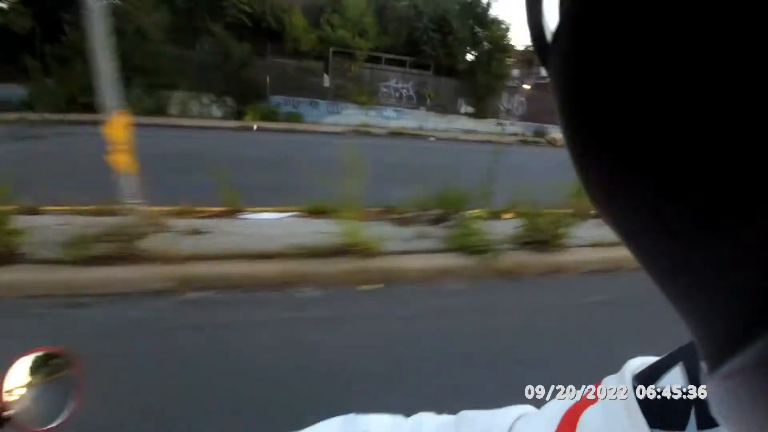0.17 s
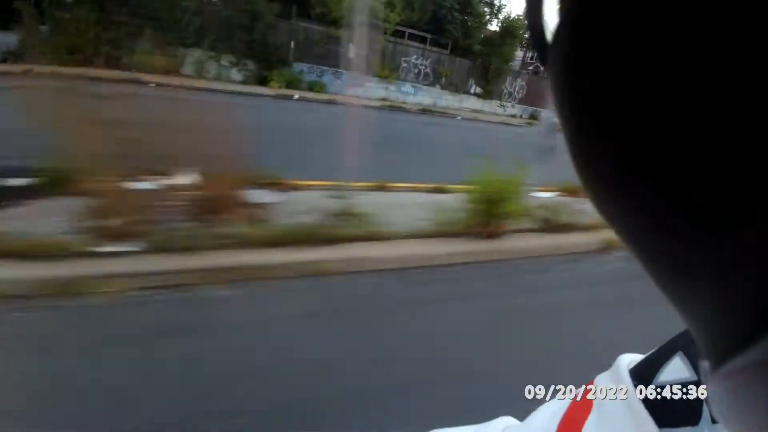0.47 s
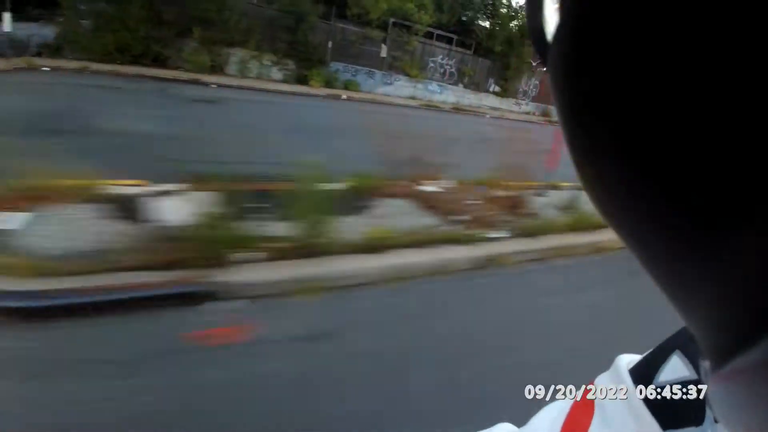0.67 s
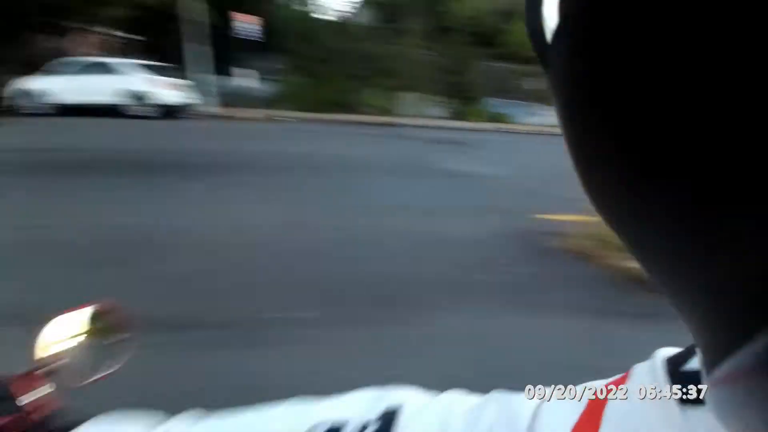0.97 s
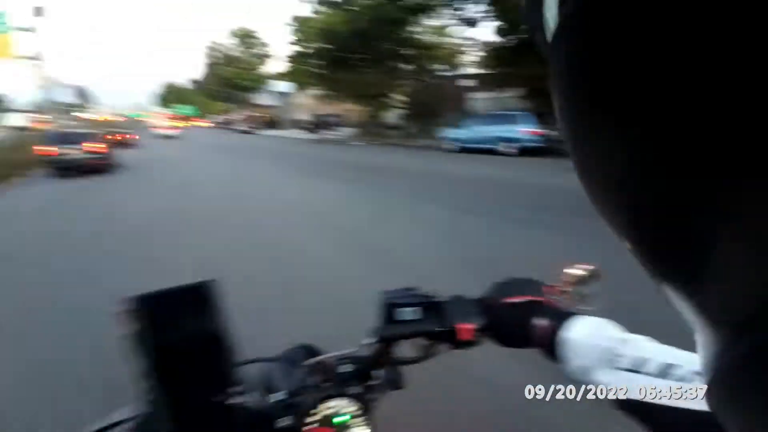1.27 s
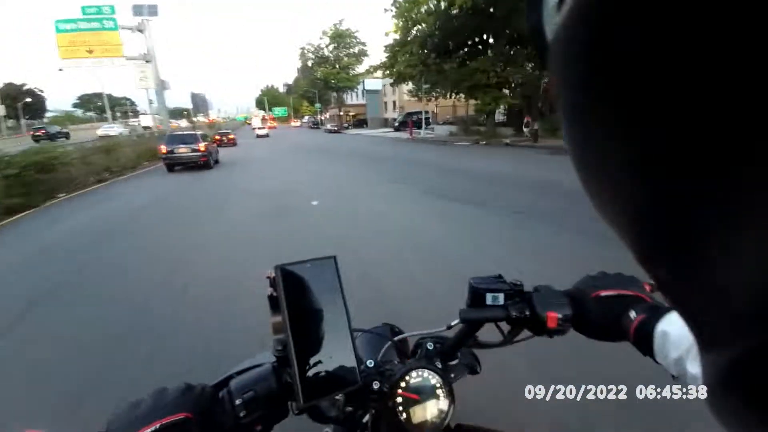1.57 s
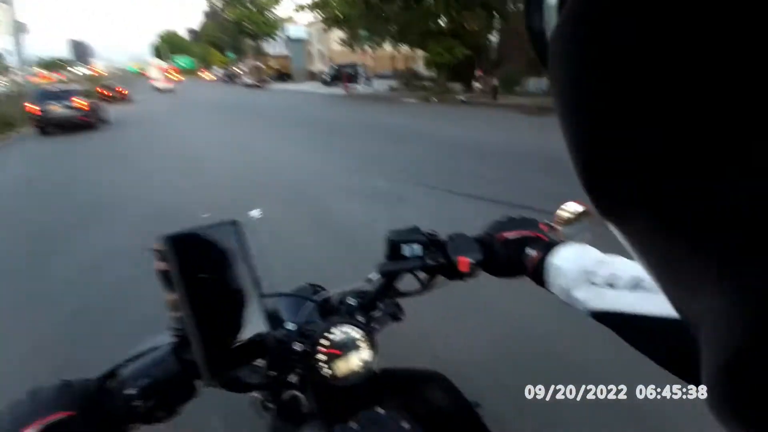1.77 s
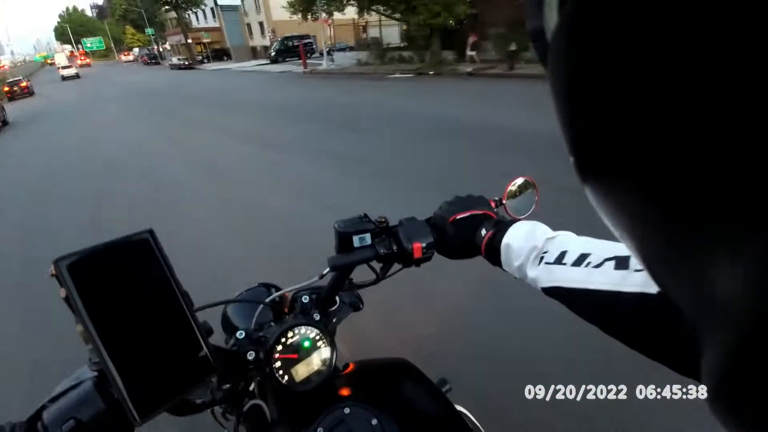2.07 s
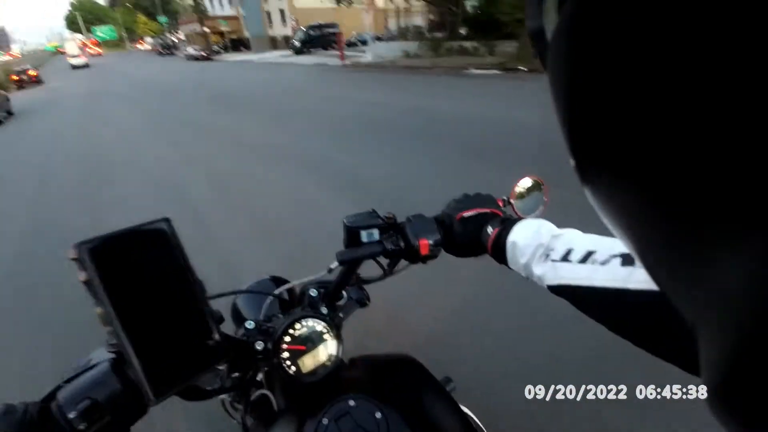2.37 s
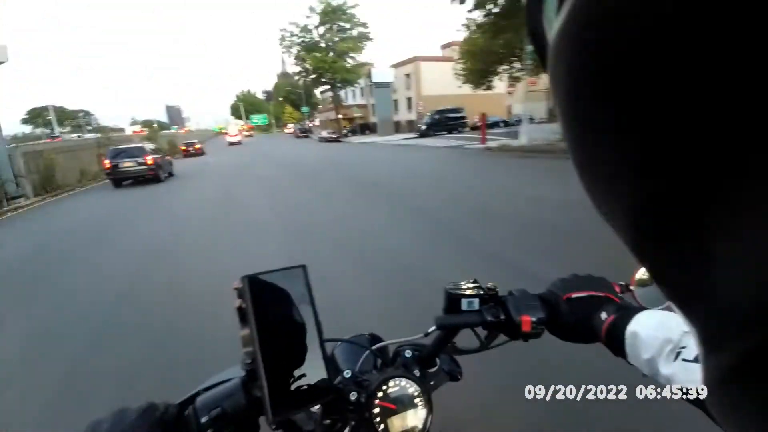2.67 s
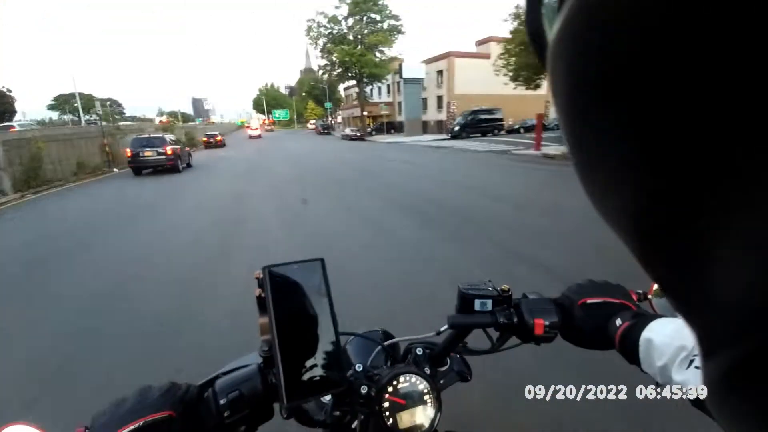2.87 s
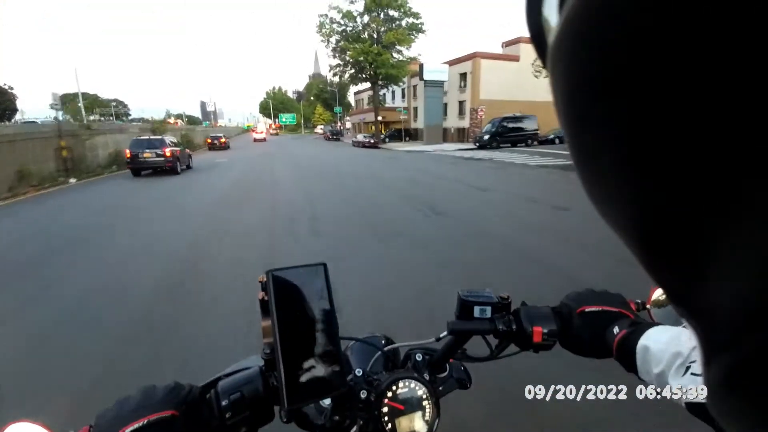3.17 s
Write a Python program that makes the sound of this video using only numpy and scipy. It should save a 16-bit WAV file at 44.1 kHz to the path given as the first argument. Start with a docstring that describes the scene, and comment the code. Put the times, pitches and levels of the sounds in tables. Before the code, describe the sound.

A twin-cylinder motorcycle holds a steady low throb on a wide open road, heard close at the rider; wind rumbles and buffets the microphone, tyres roar, and a crackling gust comes after two seconds.

```python
"""Twin-cylinder motorcycle cruising on a wide city road

Heard at a microphone on the rider: exhaust pulses in uneven pairs excite the resonances of pipe and body.
Coloured noise gives wind rumble, tyre roar and air hiss; swells of noise give buffets, and short bursts
give ticks and eddies. Dense random pops crackle, most strongly in one gust; faint whines are drifting sines.
The sound fades in quickly just after the start.
"""
import sys
import numpy as np
from scipy import signal
from scipy.fft import rfft, irfft, next_fast_len
from scipy.io import wavfile
from scipy.ndimage import uniform_filter1d, minimum_filter1d, map_coordinates

SR = 44100
rng = np.random.default_rng(int(sys.argv[2]) if len(sys.argv) > 2 else 0)


def master(y):
    """Save y as 16-bit WAV."""
    cut = np.clip(np.atleast_2d(y).T, -1, 1)
    pcm = np.round(cut * 32767)  # scale
    wavfile.write(sys.argv[1], SR, pcm.astype(np.int16))


N = 145971


def amp(db):
    """Logarithmic level: decibels to amplitude ratio."""
    return 10 ** (np.asarray(db) / 20)


def unit(x):
    """Normalisation: scale to an rms of 1."""
    return x / np.sqrt(np.mean(x ** 2) + 1e-20)


def along(points, hz):
    """Spectral envelope: interpolate (f/Hz, value) points on a logarithmic frequency axis."""
    f, value = np.transpose(points)
    return np.interp(np.log(hz + 1), np.log(f + 1), value)


def curve(rows):
    """Temporal envelope: (t/s, value) points as one value per sample."""
    return np.interp(np.arange(N) / SR, *np.transpose(rows))


def wobble(rate):
    """Random modulation: a smooth curve through normal random knots, rate knots per second."""
    knots = rng.standard_normal(int(N * rate / SR) + 4)
    return map_coordinates(knots, [np.arange(N) * rate / SR])


def filtered(x, response):
    """Linear filtering: multiply the spectrum by a response of frequency."""
    size = next_fast_len(N + SR // 2)  # zero padding leaves room for the filter's tail
    spectrum = rfft(x, size) * response(np.fft.rfftfreq(size, 1 / SR))
    return irfft(spectrum, size)[..., :N]


def noise(colour):
    """Coloured noise: white noise shaped by a spectral envelope, at rms 1."""
    white = rng.standard_normal(N)
    return unit(filtered(white, lambda hz: amp(along(colour, hz))))


def ring(pulses, colour, size=8192):
    """Minimum-phase resonance: pulses excite a causal body of the given colour, at rms 1."""
    hz = np.fft.rfftfreq(size, 1 / SR)
    cepstrum = irfft(np.log(amp(along(colour, hz))))
    # folding the cepstrum onto positive time makes the response causal
    cepstrum[1:size // 2] *= 2
    cepstrum[size // 2 + 1:] = 0
    impulse_response = irfft(np.exp(rfft(cepstrum)))
    return unit(signal.fftconvolve(pulses, impulse_response)[:N])


# air hissing past the helmet: t/s, level/dB
HISS_LEVEL = [(.15, -61), (.55, -65.5), (.62, -61), (.7, -55), (.82, -61), (.94, -61.5), (.98, -68),
              (1.04, -56), (1.14, -69.5), (1.7, -72), (2.05, -62), (2.39, -72), (2.46, -58.5), (2.54, -74),
              (2.82, -65.5), (3.03, -73), (3.17, -65.5), (3.3, -75)]
# spectrum of the hiss: f/Hz, relative level/dB
HISS_SPECTRUM = [(1500, 1.5), (3500, 10), (7500, 8.5), (10000, 9), (13000, 8.5), (15000, -25)]
# highest sizzle of the air: t/s, level/dB
SIZZLE_LEVEL = [(.15, -52.5), (.34, -52), (.43, -71), (.56, -70), (.66, -54), (.78, -56), (.95, -56.5),
                (.99, -73), (1.7, -97), (1.82, -60), (1.97, -54.5), (2.14, -54.5), (2.28, -63), (2.4, -81),
                (2.72, -70), (2.79, -63), (3.0, -68), (3.3, -79)]
# spectrum of the sizzle: f/Hz, relative level/dB
SIZZLE_SPECTRUM = [(4000, -37), (9400, -29), (10200, 3.5), (10800, -2.5), (12300, 8.5), (14000, -2),
                   (15200, 6)]


def air():
    """Aerodynamic broadband noise: hiss and a higher sizzle swell as the airflow changes its angle."""
    hiss = amp(curve(HISS_LEVEL) + 0.75 * wobble(60)) * noise(HISS_SPECTRUM)
    sizzle = amp(curve(SIZZLE_LEVEL)) * noise(SIZZLE_SPECTRUM)
    return hiss + sizzle


LOW_WHINE_HZ, MID_WHINE_HZ, HIGH_WHINE_HZ = 1035, 3397, 12174
WHINE_DRIFT_HZ = 5.3  # scale of the random pitch drift
# faint low whine: t/s, level/dB
LOW_WHINE_LEVEL = [(.2, -55.5), (.8, -63.5), (1.35, -68), (1.6, -51.5), (2.4, -86), (3.3, -64)]
# faint middle whine: t/s, level/dB
MID_WHINE_LEVEL = [(.15, -72.5), (.6, -71.5), (.8, -77), (2.6, -92)]
# faint high whine: t/s, level/dB
HIGH_WHINE_LEVEL = [(.15, -71), (.44, -70), (.56, -82), (1.5, -81), (1.66, -92), (1.76, -73), (2.55, -75),
                    (2.9, -75), (3.3, -75)]


def whines():
    """Frequency modulation: thin sine tones drift slightly in pitch, and swell and fade."""
    tones = [(LOW_WHINE_HZ, LOW_WHINE_LEVEL), (MID_WHINE_HZ, MID_WHINE_LEVEL),
             (HIGH_WHINE_HZ, HIGH_WHINE_LEVEL)]
    total = np.zeros(N)
    for hz, level in tones:
        phase = 2 * np.pi * np.cumsum(hz + WHINE_DRIFT_HZ * wobble(23.75)) / SR
        total += amp(curve(level)) * np.sqrt(2) * np.sin(phase)  # root 2 gives the sine an rms of 1
    return total


# faint ticks and scuffs of the riding gear: t/s, initial level/dB, time to decay by 60 dB/s
TICK_EVENTS = [(0.606, -50.5, .04), (.645, -55, 0.13), (0.679, -54, 0.1), (0.759, -48, .04),
               (1.191, -52, .035), (3.128, -52, 0.037)]
# spectrum of the ticks: f/Hz, relative level/dB
TICK_SPECTRUM = [(600, -29), (1800, 5), (3800, 4), (6000, -7), (10000, -6), (15000, -15)]


def ticks():
    """Exponential decay: abrupt noise bursts make dry little snaps and slightly longer scuffs."""
    t = np.arange(N) / SR
    envelope = np.zeros(N)
    for start, db, t60 in TICK_EVENTS:
        envelope += (t >= start) * amp(db - 60 * np.abs(t - start) / t60)
    return envelope * noise(TICK_SPECTRUM)


ROAD_DB = -47
# spectrum of tyres on asphalt: f/Hz, relative level/dB
ROAD_SPECTRUM = [(150, -28), (400, -2), (600, -7), (800, 7), (1100, 4), (1400, -1.5), (1900, -7.5),
                 (2400, -10), (3000, -17.5), (4200, -24.5), (5500, -22.5), (8000, -41), (12500, -44),
                 (15000, -61)]


def road():
    """Rolling noise: a steady broadband tyre roar with a slight grain from random level modulation."""
    level_db = ROAD_DB + 1.3 * wobble(6.95) + 0.84 * wobble(180)
    return amp(level_db) * noise(ROAD_SPECTRUM)


REFLECT_DB, REFLECT_T60_S = -8, 0.025  # reflected level relative to direct; time to decay by 60 dB


def reflected(x):
    """Early reflection: a short decaying noise tail stands for tank, screen and road, at equal total level."""
    t = np.arange(SR // 20) / SR
    tail = rng.standard_normal(len(t)) * amp(-60 * t / REFLECT_T60_S)
    wet = signal.fftconvolve(x, tail / np.linalg.norm(tail))[:N]
    return (x + amp(REFLECT_DB) * wet) / np.sqrt(1 + amp(REFLECT_DB) ** 2)


# wind on the microphone: t/s, level/dB
WIND_LEVEL = [(.15, -29), (.43, -30), (.7, -32), (1.03, -34), (1.16, -33), (1.35, -32), (1.7, -33.5),
              (1.87, -29.5), (2.07, -32.5), (2.43, -28.5), (2.55, -35.5), (2.85, -33), (3.07, -31),
              (3.3, -32.5)]
# spectrum of the wind rumble: f/Hz, relative level/dB
RUMBLE_SPECTRUM = [(25, -28), (44, -35), (58, -9), (85, 1), (140, 5.5), (220, -3), (340, -6.5), (480, -14),
                   (700, -23.5), (1500, -38), (4000, -58), (9000, -56)]


def wind():
    """Turbulent pressure fluctuation: low noise flutters quickly around the strength of the wind."""
    flutter_db = 1.3 * wobble(45)
    rumble = unit(noise(RUMBLE_SPECTRUM) * amp(flutter_db))
    return amp(curve(WIND_LEVEL)) * rumble


# single buffets of wind: peak t/s, half-length/s (Gaussian standard deviation), peak level/dB, centre f/Hz
BUFFET_EVENTS = [(.166, 0.024, -32.5, 463), (0.212, 0.042, -33, 230), (1.169, 0.042, -28, 206),
                 (1.28, 0.14, -43, 210), (2.08, 0.045, -36, 536), (2.45, .018, -51, 332)]
# spectrum of one buffet: f/centre f (a ratio), relative level/dB
BUFFET_SPECTRUM = [(.3, -33), (.75, 2.5), (1.3, -4), (2, -14), (4, -33), (16, -61)]


def buffets():
    """Gaussian envelope: short swells of turbulent noise, each around its own centre frequency."""
    t = np.arange(N) / SR
    total = np.zeros(N)
    for peak, length, db, centre_hz in BUFFET_EVENTS:
        spectrum = [(ratio * centre_hz, level) for ratio, level in BUFFET_SPECTRUM]
        swell = np.exp(-.5 * ((t - peak) / length) ** 2)
        total += amp(db) * swell * noise(spectrum)
    return total


POPS_PER_S, POP_SCATTER_DB = 1200, 6  # mean rate; spread of sizes before the largest are capped
# turbulent crackle in the gusts: t/s, level/dB
CRACKLE_LEVEL = [(.16, -47), (.25, -49.5), (.7, -53), (1.0, -49.5), (1.35, -48.5), (1.7, -50), (1.94, -40),
                 (2.0, -42), (2.07, -35.5), (2.135, -39.5), (2.21, -38.5), (2.28, -40), (2.33, -38.5),
                 (2.43, -39.5), (2.465, -45.5), (2.505, -36.5), (2.53, -53), (3.3, -58.5)]
# spectrum of one pop, also used by the eddies: f/Hz, relative level/dB
POP_SPECTRUM = [(60, -30), (200, -5.5), (400, 2.5), (900, -4), (1500, -11), (2500, -17.5), (4000, -26),
                (7000, -39), (14000, -47)]


def crackle():
    """Random impulse process: eddies burst on the microphone as dense pops of uneven size."""
    pops = (rng.random(N) < POPS_PER_S / SR) * np.sign(rng.standard_normal(N))
    sizes = amp(POP_SCATTER_DB * np.minimum(rng.standard_normal(N), 2))
    return amp(curve(CRACKLE_LEVEL)) * ring(pops * sizes, POP_SPECTRUM)


EDDY_T60_S, EDDY_TOP_HZ = .012, 4000  # time to decay by 60 dB; low-pass corner
# the hardest eddies: t/s, initial level/dB before the low-pass
EDDY_EVENTS = [(2.311, -26), (2.424, -30), (2.43, -29.5), (2.504, -38.5), (2.558, -30.5)]


def eddies():
    """Low-passed transient: decaying noise bursts stand out of the crackle, strong but blunt."""
    t = np.arange(N) / SR
    envelope = np.zeros(N)
    for start, db in EDDY_EVENTS:
        envelope += (t >= start) * amp(db - 60 * np.abs(t - start) / EDDY_T60_S)
    bursts = envelope * noise(POP_SPECTRUM)
    return filtered(bursts, lambda hz: 1 / np.sqrt(1 + (hz / EDDY_TOP_HZ) ** 4))


FIRST_FIRING_S, SECOND_CYLINDER_TURN = .131, 450 / 720  # turn is a share of the four-stroke cycle
ENGINE_DB, SECOND_CYLINDER_DB = -32, -4  # the second is relative to the first cylinder
FIRING_SCATTER_DB, FIRING_JITTER_S = 1.3, .0001  # standard deviations
# engine speed: t/s, four-stroke cycle rate f/Hz
ENGINE_SPEED = [(0, 19.5), (.6, 19.58), (1.2, 19.78), (1.5, 19.93), (1.8, 20.03), (2.1, 20.25),
                (2.5, 20.17), (3.3, 20.5)]
# resonances of exhaust pipe and body: f/Hz, relative level/dB
PIPE_SPECTRUM = [(40, -56), (65, -20.5), (98, 2), (122, 0.5), (160, 1.5), (200, -6), (245, -17.5),
                 (300, -6), (380, -19), (600, -34.5), (2000, -50), (8000, -94)]


def engine():
    """Source and resonator: two cylinders fire at uneven spacing, one louder, into the exhaust."""
    t = np.arange(N) / SR
    cycle = np.cumsum(curve(ENGINE_SPEED)) / SR
    cycle -= np.interp(FIRST_FIRING_S, t, cycle)  # cycle zero is the first firing
    pulses = np.zeros(N)
    for turn, db in [(0, 0), (SECOND_CYLINDER_TURN, SECOND_CYLINDER_DB)]:
        times = np.interp(np.arange(turn, cycle[-1], 1), cycle, t)
        late, strong = rng.standard_normal((len(times), 2)).T
        at = np.clip((times + FIRING_JITTER_S * late) * SR, 0, N - 1).astype(int)
        pulses[at] += amp(db + FIRING_SCATTER_DB * strong)
    return amp(ENGINE_DB) * ring(pulses, PIPE_SPECTRUM)


# bass mismatch of the two microphone ports: strength and corner of a first-order low-pass
PORT_MISMATCH_HZ, PORT_CORNER_HZ = 51.3, 7.6
# share of tyre roar that differs between the ports: f/Hz, level/dB
SPREAD_SPECTRUM = [(100, -1), (500, -9), (1000, -38.5), (2000, -28), (3000, -11.5), (5000, -17.5),
                   (8000, -22), (12000, -25)]


def scene():
    """Mid-side superposition: two close ports share most sound but differ in bass and in some tyre roar."""
    engine_and_wind = engine() + wind() + buffets() + crackle() + eddies()
    mid = engine_and_wind + reflected(road() + air() + ticks()) + whines()
    bass_side = filtered(mid, lambda hz: -PORT_MISMATCH_HZ / (PORT_CORNER_HZ + 1j * hz))
    roar_side = filtered(road(), lambda hz: amp(along(SPREAD_SPECTRUM, hz)))
    side = bass_side + roar_side
    return np.array([mid + side, mid - side])


START_S, FADE_S = .12, .034
LIMIT_DB, LIMIT_HOLD_S = -16.8, .012  # threshold for the mean of both ports; window of the gain
TOP_HZ = 15300


def record(dry):
    """Peak limiting and band limiting: a quick fade-in, peaks held down, nothing kept above the top."""
    fade = np.clip((np.arange(N) / SR - START_S) / FADE_S, 0, 1) ** 2
    hold = int(LIMIT_HOLD_S * SR)
    needed = amp(LIMIT_DB) / np.maximum(np.abs(dry.mean(axis=0)), amp(LIMIT_DB))
    gain = uniform_filter1d(minimum_filter1d(needed, hold), hold)  # lowest gain nearby, then smoothed
    return filtered(dry * fade * gain, lambda hz: hz < TOP_HZ)


dry = scene()
out = record(dry)
master(out)
```